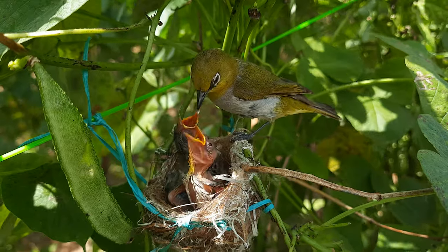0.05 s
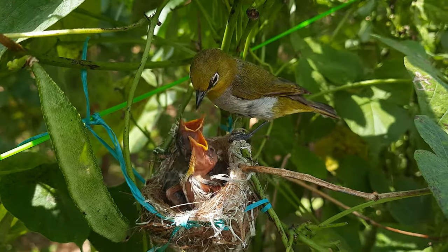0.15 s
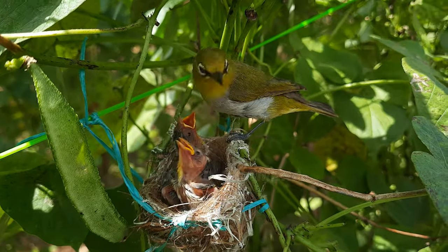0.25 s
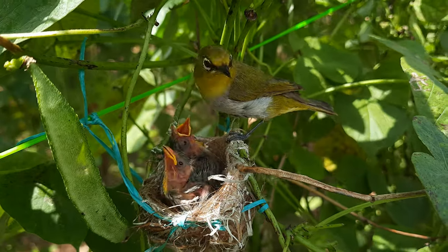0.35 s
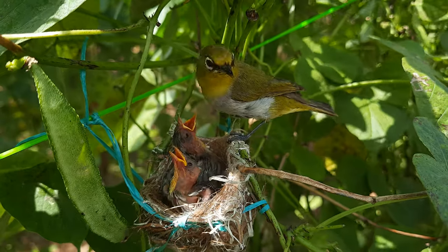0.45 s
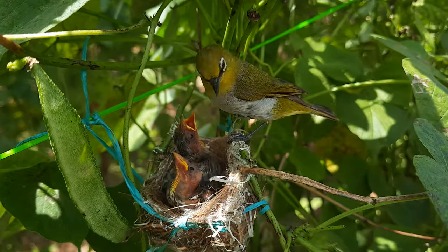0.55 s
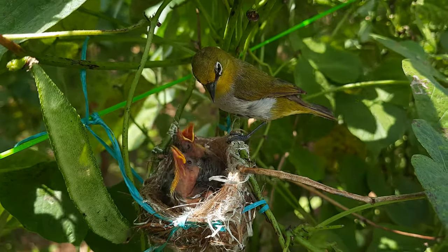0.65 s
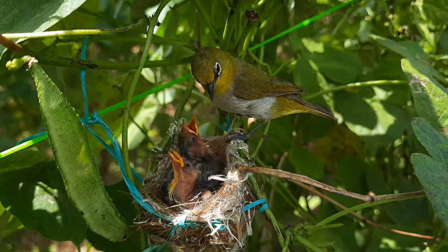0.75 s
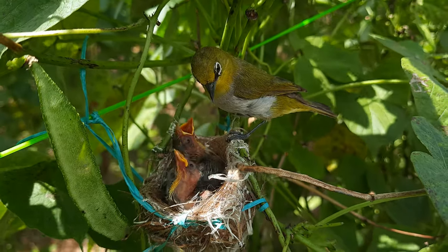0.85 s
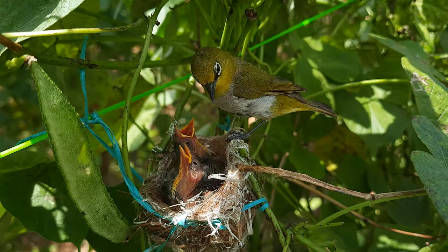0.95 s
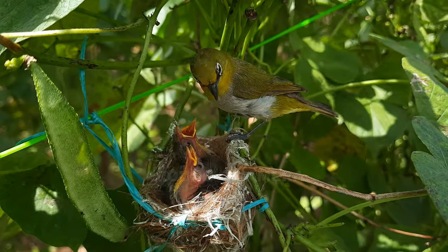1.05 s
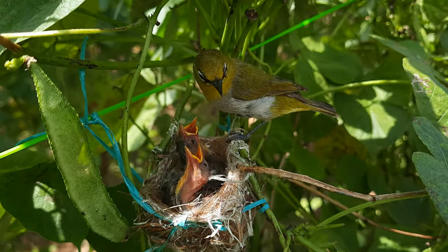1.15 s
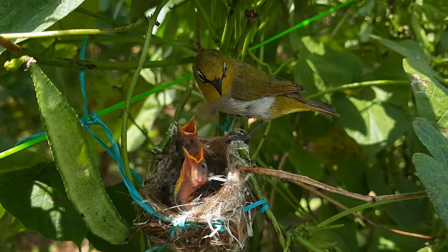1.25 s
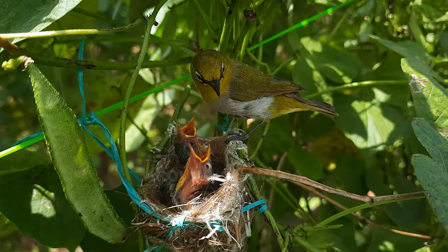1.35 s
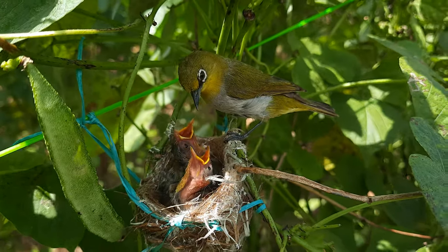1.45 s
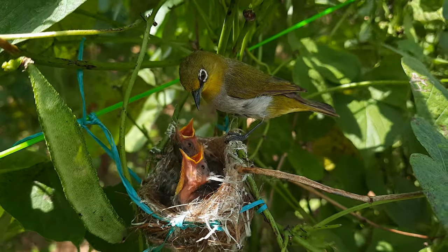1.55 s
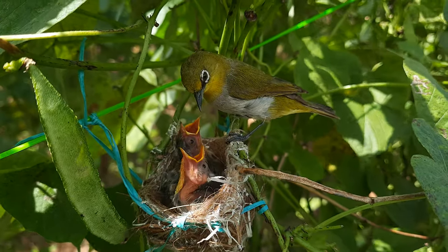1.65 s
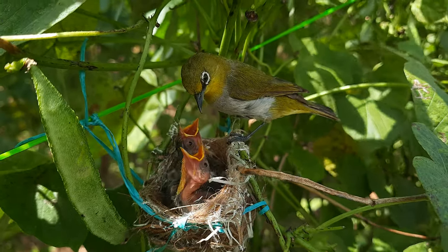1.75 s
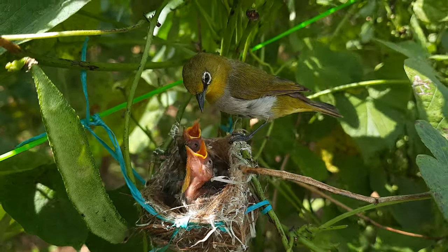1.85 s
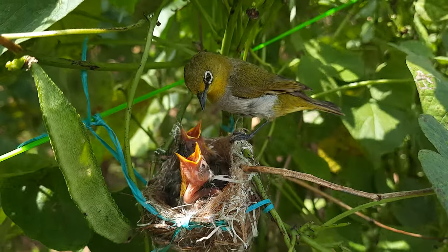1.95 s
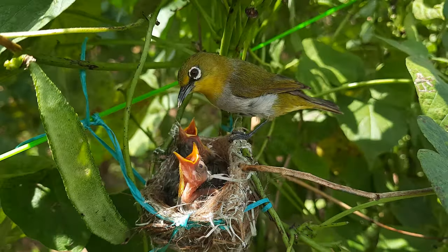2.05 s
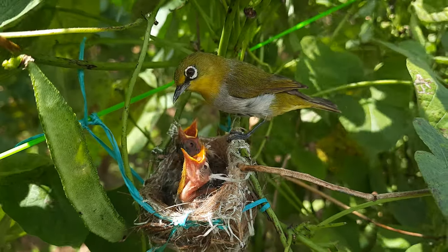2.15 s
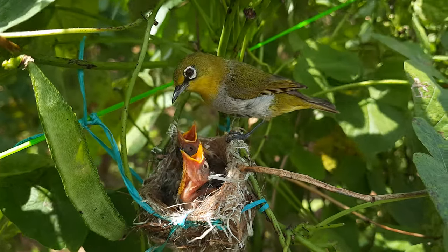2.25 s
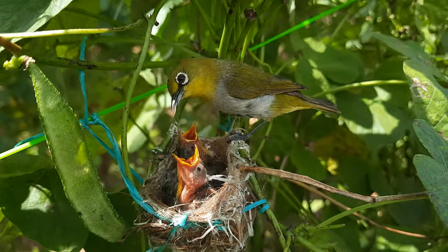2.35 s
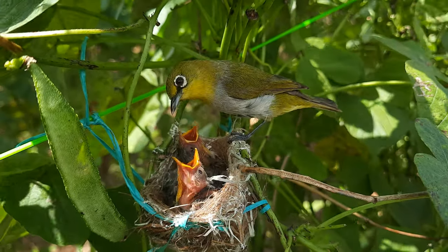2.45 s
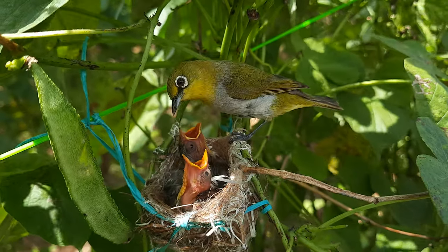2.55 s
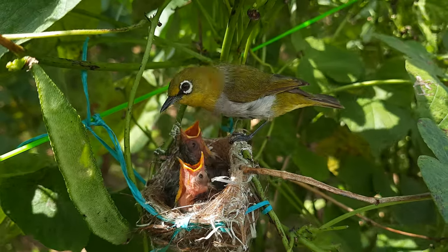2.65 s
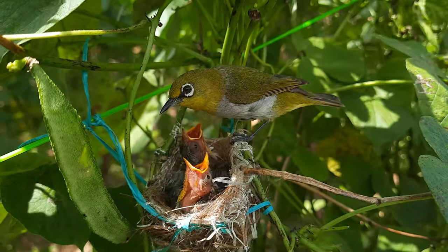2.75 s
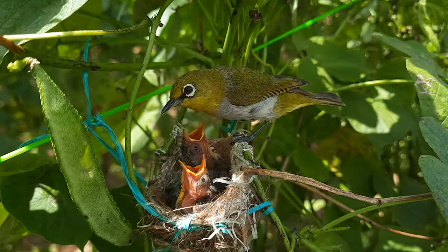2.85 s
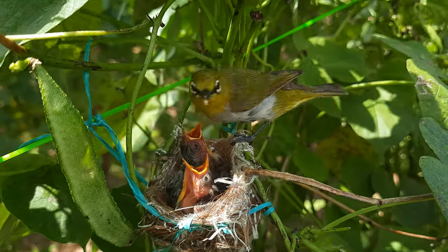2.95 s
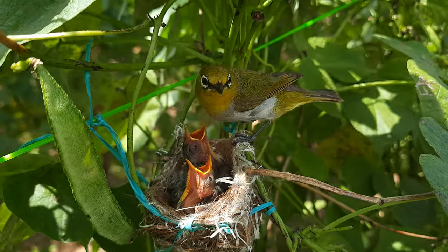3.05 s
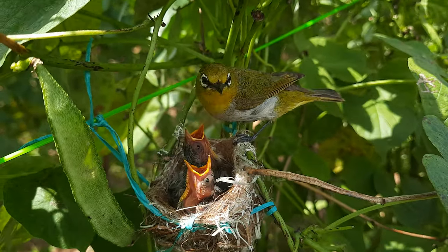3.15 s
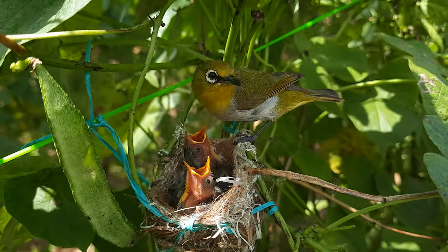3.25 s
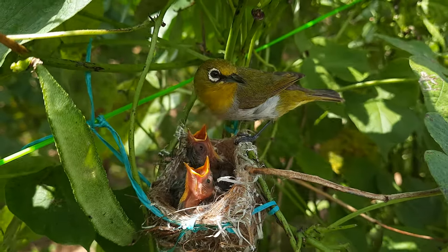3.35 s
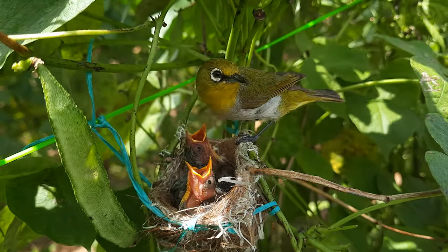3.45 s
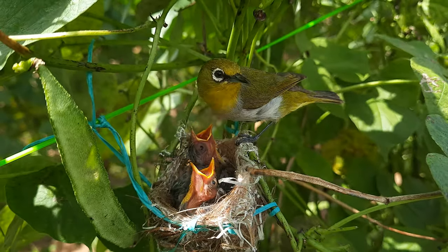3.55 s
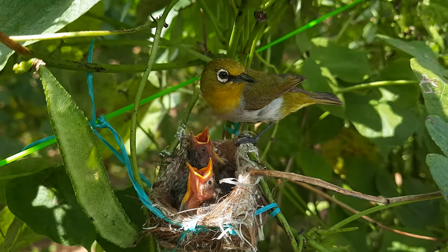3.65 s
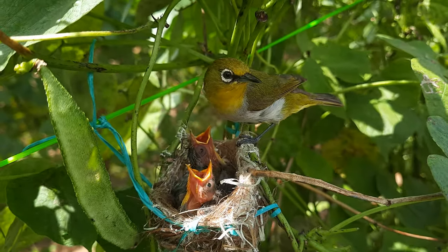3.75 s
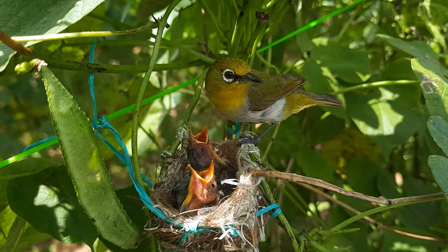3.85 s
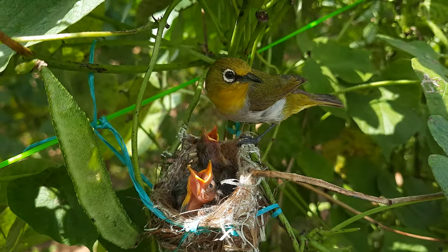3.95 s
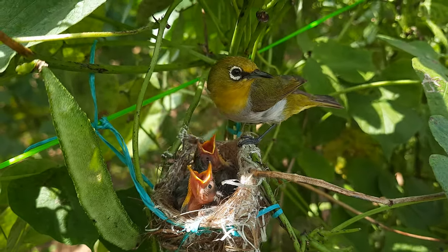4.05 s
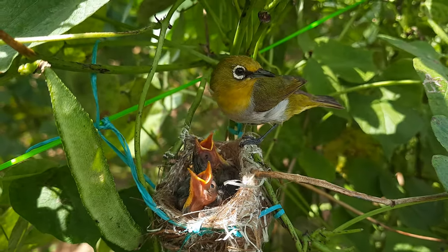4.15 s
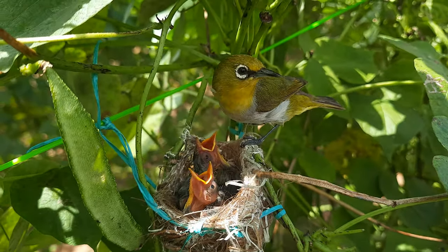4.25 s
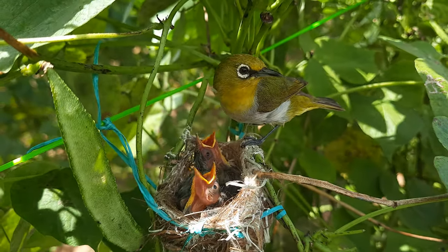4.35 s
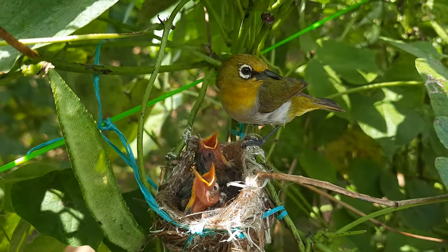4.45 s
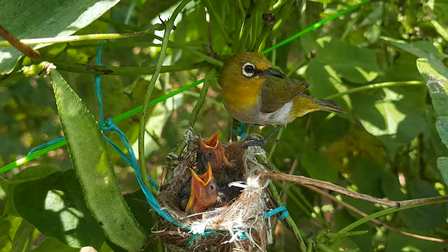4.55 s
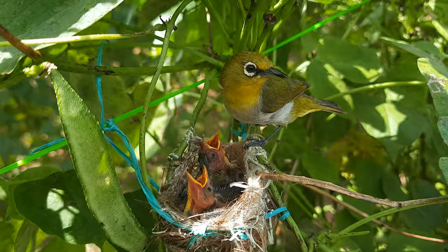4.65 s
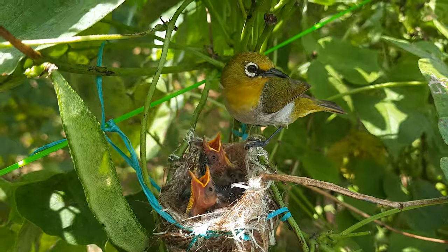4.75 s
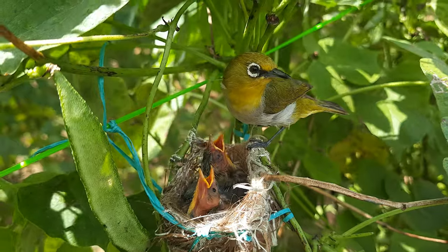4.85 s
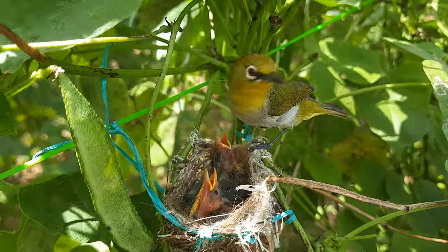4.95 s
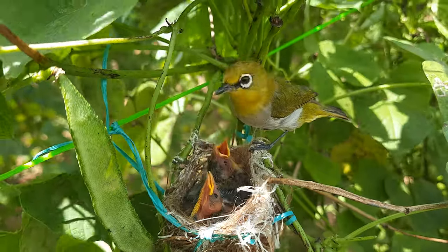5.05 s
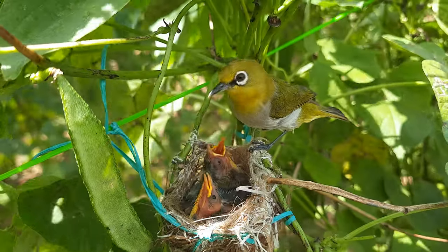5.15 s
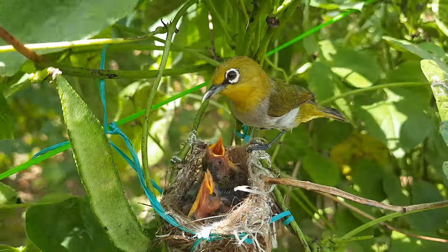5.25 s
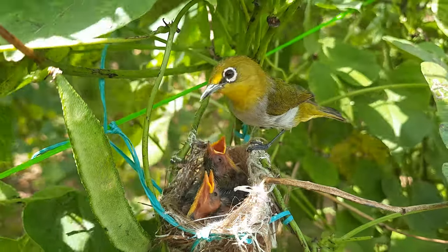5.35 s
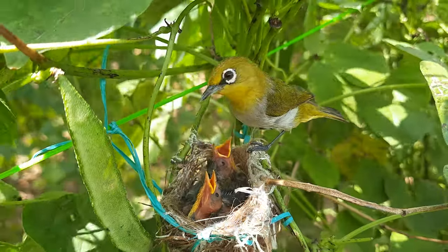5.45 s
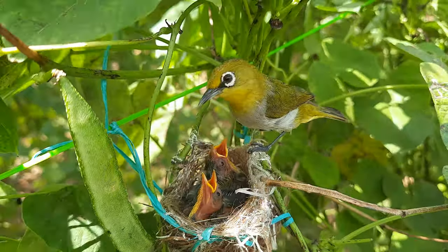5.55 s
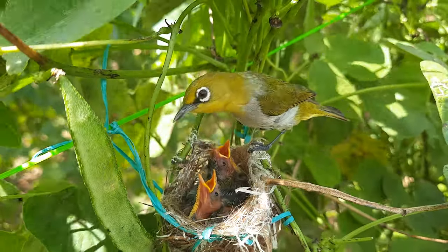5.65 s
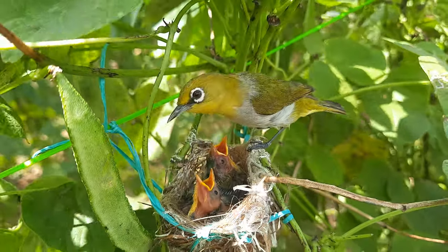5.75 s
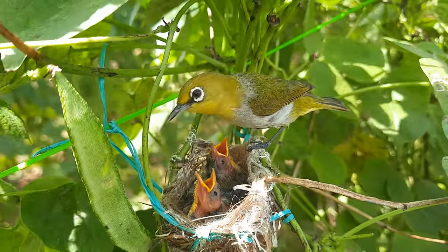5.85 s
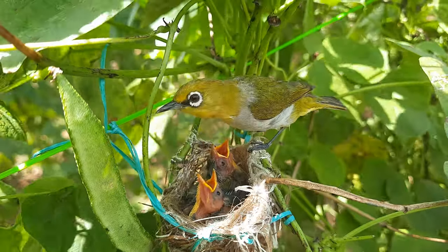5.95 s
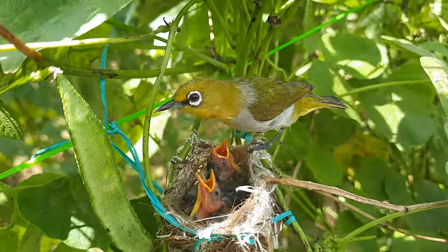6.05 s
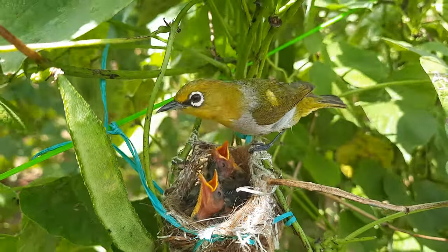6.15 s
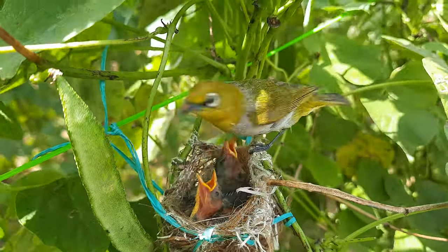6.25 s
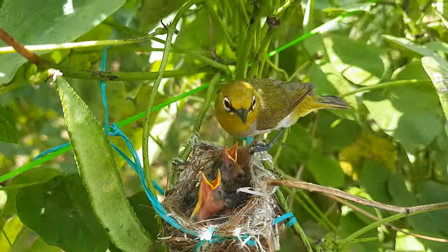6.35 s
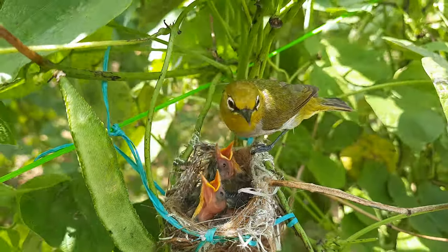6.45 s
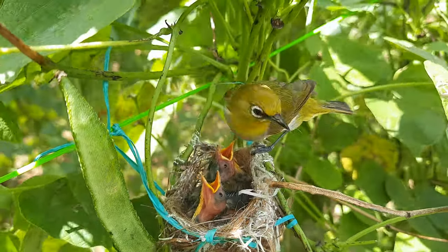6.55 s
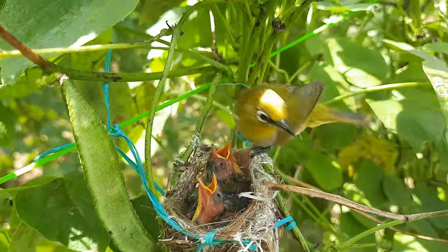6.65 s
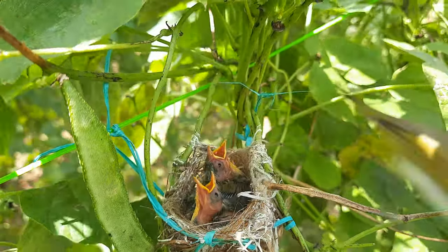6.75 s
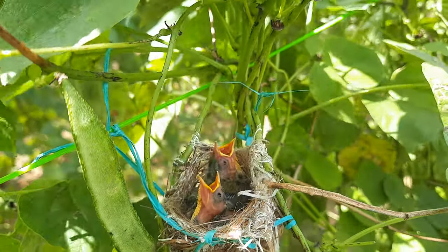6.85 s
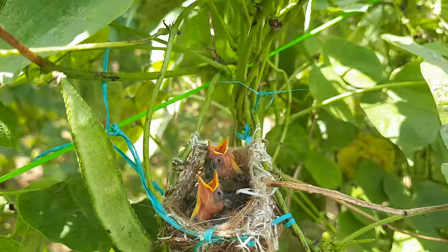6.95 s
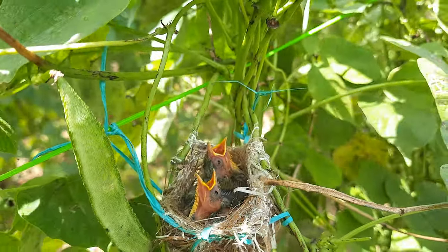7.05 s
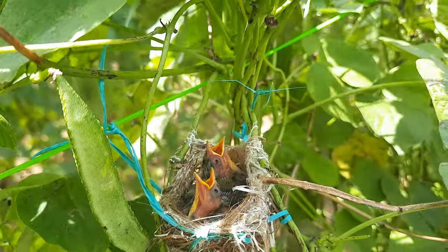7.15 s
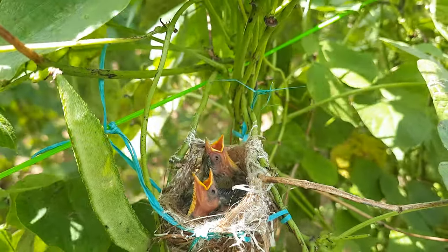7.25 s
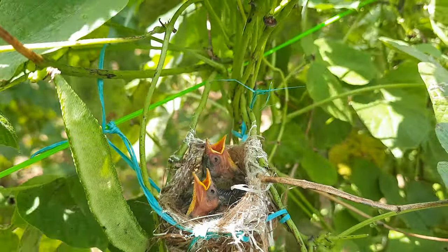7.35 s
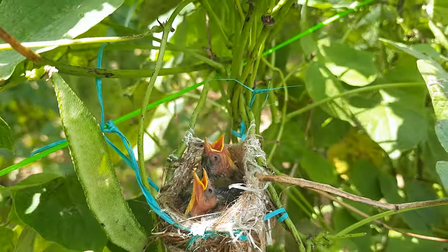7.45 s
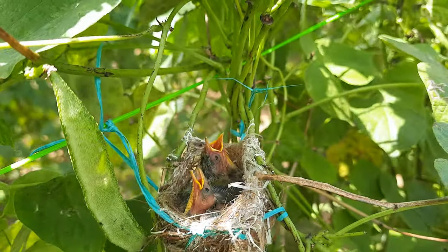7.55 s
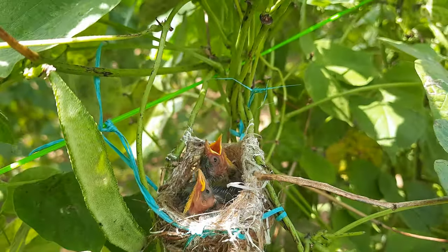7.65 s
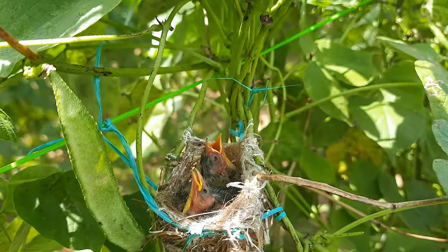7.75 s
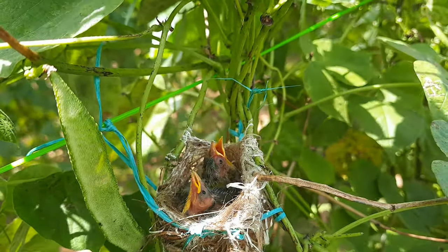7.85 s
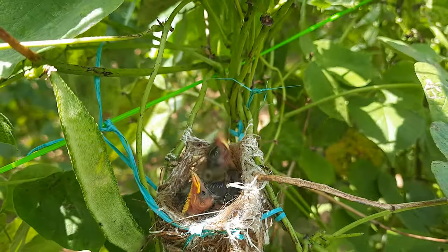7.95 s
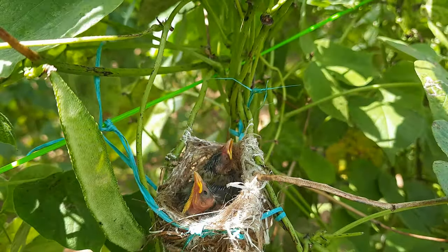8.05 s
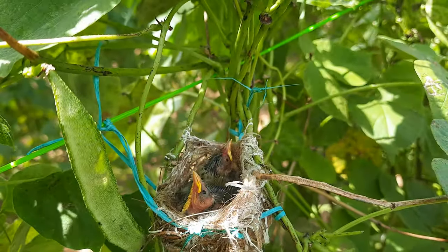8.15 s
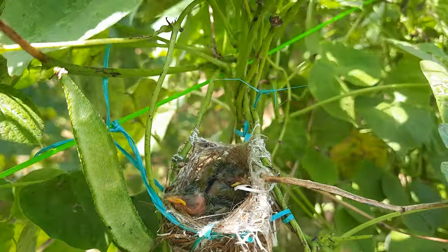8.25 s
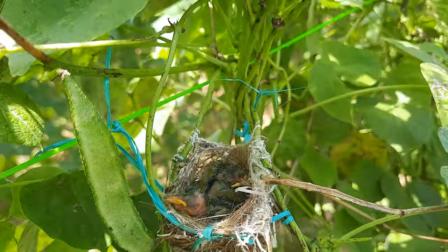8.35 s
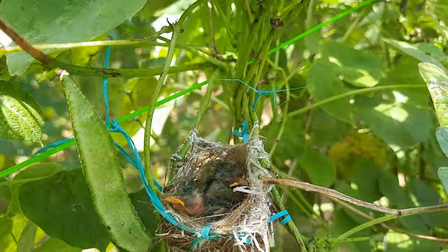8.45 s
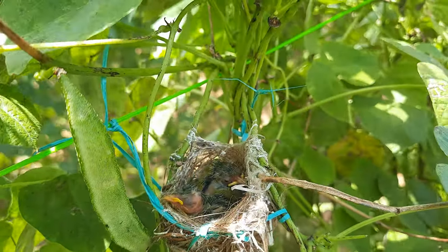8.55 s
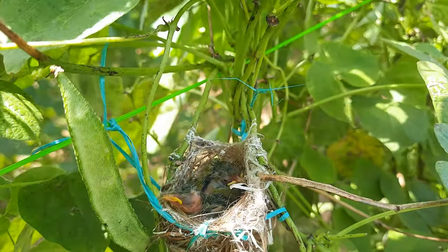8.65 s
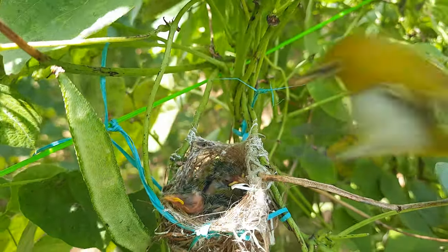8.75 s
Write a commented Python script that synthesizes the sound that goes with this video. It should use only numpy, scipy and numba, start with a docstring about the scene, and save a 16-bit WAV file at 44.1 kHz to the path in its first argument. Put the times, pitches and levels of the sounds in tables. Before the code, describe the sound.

Outdoors among leaves, a close stereo microphone picks up high, slightly raspy chick begging over quiet air and a faint insect-like hiss. A gust buffets early, there is a calmer middle with a distant rooster, then stronger windy thumps and crackly rustling. Short slurred bird chirps, dry ticks and a burst of wing puffs follow; after the last begging whistle it grows quieter, until wings flutter back at the end.

```python
"""Thin two-voiced whistles are heard first: two nestlings begging from a nest in a garden vine.
Gusts buffet each microphone port on its own and stir the leaves; a parent calls, flies off and returns.
Small ticks and soft, dry scuffs are heard; other birds, a rooster and hens are far, over a faint high hiss.
Calls are trembling near sines with harmonics; wind, leaves, wings and air are noise, filtered and swelled."""
import sys
import numpy as np
from scipy import signal
from scipy.fft import rfft, irfft, next_fast_len
from scipy.io import wavfile
from scipy.ndimage import uniform_filter1d, minimum_filter1d
from numba import njit

SR = 44100
rng = np.random.default_rng(int(sys.argv[2]) if len(sys.argv) > 2 else 0)


def master_out(mix):
    """Clip the mix to full scale and print it as 16-bit PCM to the path in sys.argv[1]."""
    frames = np.transpose(np.atleast_2d(mix))
    ceiling = np.clip(frames, -1, 1)
    pcm = np.round(ceiling * 32767).astype(np.int16)
    wavfile.write(sys.argv[1], SR, pcm)


N = 387638
TIME = np.arange(N) / SR

SAG_HZ = 127  # a begging voice sags by this much towards its end
RASP_S = 0.074  # length of the rasp at a call's break


def undb(db):
    """Level and amplitude: 20 dB is a factor of ten in gain."""
    return 10 ** (np.asarray(db) / 20)


def unit(x):
    """Normalization: scale to an rms of 1."""
    return x / np.sqrt(np.mean(x ** 2))


def curve(rows):
    """Linear interpolation: join (time_s, value) rows by straight lines."""
    return np.interp(TIME, *np.transpose(rows))


def colour(x, points, share=1):
    """Spectral shaping: filter by a share of a (frequency_hz, gain_db) outline, straight in log frequency."""
    hz, db = np.transpose(points)
    length = x.shape[-1]
    size = next_fast_len(length)
    bins = np.maximum(np.fft.rfftfreq(size, 1 / SR), 1)
    gain_db = share * np.interp(np.log(bins), np.log(hz), db)
    return irfft(rfft(x, size) * undb(gain_db), size)[..., :length]


def walk(t, rate):
    """Random modulation: normal values, rate of them a second, joined by straight lines."""
    steps = (t - t[0]) * rate
    count = int(steps[-1]) + 2
    return np.interp(steps, np.arange(count), rng.standard_normal(count))


def noise():
    """Incoherent sources: unrelated white noise for the two ports."""
    return rng.standard_normal((2, N))


def swell(at, half_length):
    """Gaussian envelope, about 35 dB down at half_length on either side of its peak."""
    return np.exp(-4 * np.minimum(((TIME - at) / half_length) ** 2, 20))


def place(x, pan_db):
    """Level difference between ports: tip a sound left (positive) or right at equal power."""
    gains = undb(np.array([[pan_db], [-pan_db]]) / 2)
    return x * unit(gains)


def ports(x):
    """Receiver response: each port colours nearby broadband sounds in its own way."""
    # the left port faces the vine but hears less of the top octave; each port takes a share of the outline:
    # frequency_hz, left_minus_right_db (before the shares)
    port_balance = [(900, 5.5), (2400, 11), (5000, 10.5), (7300, 8.5), (8600, 20), (10200, -23.5),
                    (12000, -21.5), (15000, 1)]
    return np.array([colour(x[0], port_balance, 0.26), colour(x[1], port_balance, -0.17)])


def garden(x, t60, wet_db, pan_db, lag_ms):
    """Arrival delay and reverberation: the left port hears lag_ms later; foliage and walls scatter sound."""
    t = np.arange(SR) / SR
    decay = np.exp(-np.log(1000) * t / t60)  # 60 dB down after t60 seconds
    scatter = rng.standard_normal((2, SR)) * decay * np.minimum(t / 0.0079, 1)
    scatter /= np.sqrt(np.sum(scatter ** 2, axis=1, keepdims=True))
    direct = np.array([np.roll(x, int(round(lag_ms * SR / 1000))), x])
    echo = signal.fftconvolve(x[None], scatter, axes=1)[:, :N]
    return place(direct, pan_db) + undb(wet_db) * place(echo, pan_db / 2)


def syrinx(notes, partials_db, jitter, flutter_db, tremor_rate, edge_s, gape=((0, 0),)):
    """Self-sustained oscillation: a membrane sings near sines of trembling pitch and loudness."""
    out = np.zeros(N)
    for note in notes:
        s, hz, db = np.transpose(note)
        first = max(int((s[0] - edge_s / 2) * SR), 0)
        last = min(int((s[-1] + edge_s / 2) * SR), N)
        span = np.arange(first, last)
        t = span / SR
        pitch = np.interp(t, s, hz) * (1 + jitter * walk(t, tremor_rate))
        phase = 2 * np.pi * np.cumsum(pitch) / SR
        gate = np.sin(np.pi / 2 * np.clip(np.minimum(t - t[0], t[-1] - t) / edge_s, 0, 1)) ** 2
        loudness = gate * undb(np.interp(t, s, db) + flutter_db * walk(t, tremor_rate / 2))
        lift_db = np.interp(t, *np.transpose(gape))
        tone = sum(undb(partial_db + k * lift_db) * np.sin((k + 1) * phase)
                   for k, partial_db in enumerate(partials_db))
        out[span] += np.sqrt(2) * loudness * tone
    return out


def bursts(rows, width_hz):
    """Resonance: short swells of band-passed noise; length_s is their width about 2.3 dB down."""
    out = np.zeros(N)
    for at, length_s, hz, db in rows:
        edges_hz = [max(hz - width_hz / 2, 100), hz + width_hz / 2]
        band = signal.butter(2, edges_hz, "band", fs=SR, output="sos")
        hiss = unit(signal.sosfilt(band, rng.standard_normal(N)))
        out += undb(db) * swell(at, 1.95 * length_s) * hiss
    return out


def beg(start, length, low_length, low_hz, high_hz, scoop_hz, low_db, high_db, break_s, drop_hz):
    """Coupled voices: both scoop up, warble together and sag; each stutters alone; the low one may drop."""
    age = np.arange(0, max(length, low_length), 1 / 500)
    # shared warble of 60 Hz at 36 new values a second, and a scoop that closes by a factor e in 45 ms
    bend = 60 * walk(age, 36) - scoop_hz * np.exp(-age / 0.045)
    drops = drop_hz > SAG_HZ
    fallen = drops * (1 - np.exp(-np.maximum(age - break_s, 0) / 0.018))

    def voice(hz, db, joins, ends):
        """One oscillator of the pair, as (time_s, pitch_hz, level_db) rows."""
        late = (age / ends) ** 4
        onset_db = -10.5 * np.exp(-np.maximum(age - joins, 0) / 0.01)
        fade_db = -5 * late
        stutter_db = 3.6 * walk(age, 55)
        pitch = hz + bend - SAG_HZ * late
        rows = np.column_stack([start + age, pitch, db + onset_db + fade_db + stutter_db])
        return rows[(age >= joins) & (age <= ends)]

    # a low voice that drops also gets weaker; the high voice joins after 15 % of the call
    return (voice(low_hz - drop_hz * fallen, low_db - 8.5 * fallen, 0, low_length),
            voice(high_hz, high_db, 0.15 * length, length))


def buzz(at, hz, db):
    """Modulation sidebands: at the break the membrane flaps and throws a comb above its pitch."""
    spacing_hz, loss_db = 578, 3.5  # each step is weaker by loss_db
    return [[(at + side * RASP_S / 2, hz + k * spacing_hz - side * SAG_HZ / 2, db - loss_db * k)
             for side in (-1, 1)] for k in (1, 2, 3)]


def nestlings(coupling=0.16):
    """Beating of two oscillators: both sides of the syrinx whistle at once, and a rasp marks each break."""
    # begging calls: start_s, length_s, low_length_s, low_pitch_hz, high_pitch_hz, scoop_hz (from below),
    # low_level_db, high_level_db, break_s (after start), rasp_level_db, low_drop_hz
    begs = [(0.0, 0.058, 0.035, 5900, 6520, 0, -65, -64, .03, -72, 0),
            (0.202, 0.31, 0.3, 5700, 6460, 560, -56.5, -63.5, .125, -64, 0),
            (1.008, 0.29, 0.25, 5780, 6560, 764, -58.5, -63.5, 0.076, -62, 1097),
            (1.241, 0.22, 0.12, 6360, 6600, 650, -61.5, -76, .1, -75, 0),
            (1.425, 0.26, .19, 5720, 6590, 881, -58.5, -56.5, .11, -64, 1098),
            (1.689, 0.11, 0.077, 5850, 6250, 252, -57, -56, .06, -67, 0),
            (1.8, .28, .28, 5660, 6470, 645, -50.5, -55, 0.058, -55.5, 0),
            (2.294, 0.25, 0.28, 5740, 6440, 766, -55.5, -52.5, 0.14, -66, 849),
            (2.544, 0.052, 0.046, 6200, 6580, 95, -52, -48, 0.0098, -60, 0),
            (2.749, 0.25, 0.23, 5500, 5700, 518, -52, -65, 0.21, -71, 0),
            (3.186, .08, 0.085, 5230, 5400, 332, -60, -78, .05, -84, 0),
            (3.272, .08, 0.083, 5260, 5400, 80, -57.5, -80, .04, -84, 0),
            (3.63, 0.093, 0.097, 5190, 5460, 195, -62.5, -80, .04, -86, 0),
            (4.327, 0.24, 0.2, 6880, 7340, 1500, -57, -74, 0.17, -60, 0),
            (5.138, 0.084, 0.077, 6400, 7000, 700, -56, -65, .05, -64, 0),
            (5.277, .21, .21, 7800, 8300, 1902, -51.5, -57, .13, -63, 0),
            (5.776, 0.28, 0.19, 7740, 8040, 1400, -55.5, -56.5, .13, -62.5, 0),
            (5.957, .26, 0.22, 5790, 6030, 749, -50, -54, 0.082, -58, 0),
            (6.335, 0.22, 0.15, 7940, 8150, 1250, -55.5, -53, 0.11, -64, 0),
            (6.471, 0.16, 0.24, 5760, 6680, 717, -51, -54.5, 0.096, -58.5, 0),
            (6.83, .22, 0.23, 6900, 7250, 845, -57, -61, 0.13, -63, 0),
            (6.91, 0.21, 0.25, 5740, 6450, 558, -46, -52.5, 0.067, -61, 0),
            (7.385, .28, .24, 5670, 6400, 512, -50.5, -53.5, .11, -57, 0)]
    # a wide-open beak lets the overtone out: time_s, overtone_lift_db
    beak_opening = [(0, 12.5), (1.35, 13), (1.8, -3), (2.9, -1), (4, 4), (8.79, -16)]
    voices, rasps, sidebands = [], [], []
    for (start, length, low_length, low_hz, high_hz, scoop_hz,
         low_db, high_db, break_s, rasp_db, drop_hz) in begs:
        if rasp_db > low_db - 8:  # only a rasp near the voice's level throws sidebands
            sidebands += buzz(start + break_s, low_hz - SAG_HZ, rasp_db)
        voices.append(beg(start, length, low_length, low_hz, high_hz, scoop_hz,
                          low_db, high_db, break_s, drop_hz))
        rasps.append((start + break_s, RASP_S, (low_hz + high_hz - drop_hz) / 2, rasp_db))
    low_notes, high_notes = zip(*voices)
    tremble = dict(jitter=.01, flutter_db=1.8, tremor_rate=450, edge_s=.008, gape=beak_opening)
    low = syrinx(low_notes, [0, -20], **tremble)
    high = syrinx(high_notes, [0, -24], **tremble)
    # the two membranes share one air stream, so their beat throws sidebands above and below
    power = uniform_filter1d((low + high) ** 2, size=12)
    beat = power / (np.abs(uniform_filter1d(power, size=200)) + 1e-12) - 1
    comb = syrinx(sidebands, [0], jitter=.012, flutter_db=3, tremor_rate=400, edge_s=.015)
    whistles = (low + high) * (1 + coupling * beat) + comb
    calls = whistles + bursts(rasps, width_hz=1600)
    return ports(garden(calls, t60=0.13, wet_db=-13.5, pan_db=6.5, lag_ms=.43))


def leaves():
    """Superposition of impulses: countless tiny scrapes of leaf on leaf merge into an uneven, crackly hiss."""
    # stirring leaves: time_s, level_db
    stirring = [(0, -62.5), (1.3, -64.5), (1.9, -57.5), (2.55, -62.5), (3.15, -73), (3.43, -62.5),
                (3.7, -79), (4.35, -74), (5.15, -49.5), (5.62, -50.5), (5.76, -55), (6.2, -52.5),
                (6.43, -47.5), (7.1, -48.5), (7.4, -56.5), (7.65, -57.5), (8.0, -71), (8.79, -62)]
    # spectrum of the rustle: frequency_hz, relative_level_db
    rustle_colour = [(500, 3), (1100, -9.5), (1900, -1), (2700, -3.5), (4500, -2), (6800, -0.5),
                     (8100, 4.5), (9300, -4.5), (12500, -7.5), (15500, -11)]
    # where the leaves stir: time_s, left_minus_right_db
    stir_side = [(0, -2.5), (1.2, -7), (2, -2), (4.5, -2), (5.5, 0), (6.5, 1), (7.3, 1.5), (8.79, 5)]
    sizes = np.minimum(rng.exponential(size=N // 40 + 1), 4.5)  # each holds for 40 samples
    scrapes = noise() * undb(2.4 * np.repeat(sizes, 40)[:N])
    hiss = unit(ports(colour(scrapes, rustle_colour)))
    side_db = np.array([[1], [-1]]) * curve(stir_side) / 2
    return hiss * undb(curve(stirring) + side_db + 1.04 * walk(TIME, 60))


def background():
    """Stationary noise: still garden air, and above it a thin hiss, as of insects."""
    # spectrum of the air: frequency_hz, relative_level_db
    air_colour = [(20, -11.5), (58, -0.5), (130, -10), (300, -8), (600, -15.5), (1100, -22.5),
                  (1900, -21.5), (3800, -31.5), (8000, -30.5), (10500, -34.5), (15500, -35.5)]
    # thin hiss: time_s, level_db (before an 8 dB lift)
    insects = [(0, -72.5), (1.4, -73.5), (1.9, -68.5), (2.85, -76), (4.4, -75.5), (4.8, -76)]
    # spectrum of the thin hiss: frequency_hz, relative_level_db
    insect_colour = [(4000, -22), (6500, -15.5), (7400, -7.5), (8200, -0.5), (8800, -6), (9300, -16),
                     (11000, -42)]
    air = unit(colour(noise(), air_colour)) * undb(-60 + 0.12 * walk(TIME, 13.0))
    hiss_db = curve(insects) + 8.0 + 3.1 * walk(TIME, 30)
    hiss = unit(colour(noise(), insect_colour)) * undb(hiss_db)
    return air + place(hiss, pan_db=1.0)


def wind_level(breeze, side):
    """Addition of powers: a fluttering breeze, and gusts that rise fast, hold and die away, in dB."""
    # gusts: full_s, port (0 left, 1 right), hold_s, level_db (before the wind's overall gain)
    gusts = [(0.198, 1, 0.035, -37), (0.334, 1, 0.072, -38.5), (1.529, 1, 0.039, -32),
             (1.65, 1, 0.0094, -21.5), (1.823, 1, 0.09, -16.5), (1.852, 0, 0.094, -16),
             (2.186, 1, 0.026, -24), (2.284, 0, 0.095, -33.5), (2.342, 1, 0.02, -22),
             (2.532, 1, 0.058, -23), (2.715, 1, 0.017, -31.5), (2.946, 1, 0.027, -24.5),
             (3.212, 1, 0.2, -26), (3.561, 1, 0.13, -37), (3.849, 1, 0.017, -32.5), (4.048, 1, .02, -38.5),
             (4.709, 0, .015, -39), (4.899, 0, 0.013, -37.5), (5.045, 0, 0.021, -24.5),
             (5.245, 1, .04, -36), (5.261, 0, 0.031, -26), (5.376, 1, 0.033, -21), (5.425, 0, 0.0076, -24),
             (5.557, 0, 0.061, -17), (5.56, 1, .05, -41), (5.778, 0, 0.053, -30), (5.93, 0, 0.12, -19.5),
             (6.379, 0, 0.027, -15.5), (6.43, 1, 0.027, -29), (6.488, 0, 0.064, -28.5),
             (6.599, 1, 0.016, -30.5), (6.878, 1, 0.064, -19), (7.084, 0, .11, -12.5),
             (7.207, 1, .02, -22.5), (7.361, 1, .025, -21), (7.377, 0, 0.016, -28), (7.452, 1, 0.075, -18),
             (7.47, 0, 0.029, -32.5), (7.748, 0, 0.012, -32.5), (7.741, 1, 0.012, -30.5),
             (8.113, 1, .1, -36.5), (8.659, 1, 0.019, -39.5), (8.776, 1, .02, -32)]
    attack_s, release_s = 0.015, 0.023  # time to grow or die by a factor e
    power = undb(curve(breeze) + 5.5 * walk(TIME, 24)) ** 2
    for at, port, hold, db in gusts:
        if round(port) == side:
            fade = np.maximum((at - TIME) / attack_s, (TIME - at - hold) / release_s)
            power = power + (undb(db) * np.exp(-np.clip(fade, 0, 20))) ** 2
    return 10 * np.log10(power)


@njit
def lowpass(x, hz, damping):
    """Second-order resonator: a state-variable low-pass with a moving corner."""
    y, b, l = np.empty(len(x)), 0., 0.
    for i in range(len(x)):
        g = np.tan(np.pi * hz[i] / SR)
        v = (b + g * (x[i] - l)) / (1 + g * (g + damping))
        y[i] = l + g * v
        b, l = 2 * v - b, 2 * y[i] - l
    return y


def buffet(db, corner_hz):
    """Turbulence at one port: the harder the gust, the smaller and faster its eddies."""
    eddies = colour(rng.standard_normal(N), [(15, -54), (30, -20), (48, 7.0), (85, 6), (150, -6),
                                             (240, -7.0), (400, -17), (700, -14.0), (2000, -38)])
    eddy_size = .17 * walk(TIME, 70)  # octaves
    # the corner is corner_hz at -25 dB and climbs an octave every 23 dB
    corner = np.clip(corner_hz * 2 ** ((db + 25) / 23 - eddy_size), 80, 500)
    rumble = lowpass(lowpass(eddies, corner, np.sqrt(2)), corner, np.sqrt(2))
    rumble = lowpass(rumble, 1.68 * corner, 1.)  # the port averages out eddies smaller than itself
    # the slowest eddies are thinned, over a wider band as the corner climbs
    rumble = rumble - lowpass(rumble, 0.54 * corner, 2.2)
    # the gust alone sets the strength from moment to moment
    power = uniform_filter1d(uniform_filter1d(rumble ** 2, size=950), size=950)
    return rumble / np.sqrt(np.abs(power) + 1e-12) * undb(db)


def thumps(cycles=0.6):
    """Pressure pulse: a single hard eddy strikes one port, pushing and then pulling the diaphragm."""
    # single eddies: time_s, port (0 left, 1 right), frequency_hz, level_db (of the sine before its swell)
    strikes = [(1.886, 1, 246, -2.5), (2.188, 1, 194, -14.5), (5.047, 0, 113, -16), (5.423, 0, 171, -12.5),
               (2.967, 1, 162, -23), (5.577, 0, 231, -8.5), (5.771, 0, 187, -18.5),
               (6.027, 0, 129.6, -11.5), (6.381, 0, 188, -10.5), (7.093, 0, 202, -5), (7.107, 0, 212, 1),
               (7.126, 0, 304, -2.5), (7.16, 0, 273, 0), (7.454, 1, 180, -1), (7.509, 1, 206, -10)]
    out = np.zeros((2, N))
    for at, port, hz, db in strikes:
        turns = (TIME - at) * hz
        out[int(round(port))] -= undb(db) * np.sin(2 * np.pi * turns) * swell(at, 2 * cycles / hz)
    return out


def wind():
    """Flow noise: each port has its own breeze, gusts and thumps."""
    # the breeze between gusts, left and right: time_s, level_db (before the overall gain below)
    breezes = [[(0, -60), (.7, -60), (1.1, -82), (1.6, -54), (2.02, -34), (2.6, -47.5), (3.15, -62),
                (3.45, -50.5), (3.9, -67), (4.6, -68), (5.1, -33), (6.1, -36), (6.65, -37.5), (7.25, -22.5),
                (7.65, -53.5), (8.1, -54), (8.55, -56), (8.79, -41)], [(0, -45.5), (.3, -55), (.75, -57), (1.0, -94), (1.42, -58.5),
                                     (1.7, -26), (2.0, -28), (2.65, -34.5), (3.1, -49), (3.5, -39),
                                     (4.1, -52), (4.4, -63), (5.5, -51), (6.7, -54), (7.4, -27), (7.7, -35),
                                     (7.95, -51), (8.5, -75)]]
    # where the rumble of a moderate gust falls off, left and right: corner_hz
    corners = [255, 234]
    rumble = np.array([buffet(wind_level(breeze, side), corners[side])
                       for side, breeze in enumerate(breezes)])
    return undb(0.33) * rumble + thumps()


def cluck(start, length, hz, rise_hz, db):
    """Pitch contour: a hen's call is a tilted arch, lower and weaker at its ends."""
    along = np.linspace(-1, 1, 15)
    pitch = hz + rise_hz * along / 2 - 36 * along ** 2
    return np.column_stack([start + length * (along + 1) / 2, pitch, db - 1.5 * along ** 2])


def poultry():
    """Harmonics and throat resonance: hoarse far calls with strong echoes."""
    # far rooster, one curve per syllable: time_s, pitch_hz, level_db (before the throat)
    rooster_syllables = [
        [(4.18, 707, -81), (4.26, 689, -71), (4.45, 696, -82)],
        [(4.47, 772, -73), (4.62, 774, -75), (4.74, 773.6, -61.5), (4.92, 761, -73), (5.2, 703, -65),
         (5.45, 697.6, -64.5), (5.68, 684, -63), (5.85, 676, -68), (5.98, 684, -71)],
    ]
    # the throat picks out one partial or the other: frequency_hz, gain_db
    rooster_throat = [(690, -16.5), (765, -1.5), (1100, -2), (1380, 4), (1530, 2), (2100, -24), (3100, -30)]
    # far hens: start_s, length_s, pitch_hz, rise_hz, level_db (before the partials' own levels)
    hen_calls = [(.23, 0.11, 615, 36, -58), (.65, 0.1, 546, -27, -56.5), (.82, 0.076, 465, 32, -62),
                 (.96, 0.055, 780, 29.5, -69), (1.37, 0.26, 710, 180, -69.5),
                 (1.845, 0.067, 570, -7, -49.5), (2.46, 0.057, 608, 35, -59), (2.56, 0.067, 513, 71, -55.5),
                 (3.67, 0.076, 712, 28, -66), (7.91, .12, 732, 53.5, -64.5)]
    crow = syrinx(rooster_syllables, [0, 0, -3, -6],
                  jitter=.028, flutter_db=3.5, tremor_rate=160, edge_s=.03)
    rooster = colour(crow, rooster_throat)
    hens = syrinx([cluck(*row) for row in hen_calls], [-2, -23],
                  jitter=.075, flutter_db=3, tremor_rate=200, edge_s=.015)
    return (garden(rooster, t60=0.37, wet_db=-0.5, pan_db=-3, lag_ms=-0.27)
            + garden(hens, t60=0.46, wet_db=-5, pan_db=3.0, lag_ms=0))


def ticks():
    """Impulse excitation: dry little snaps of twig and beak die away exponentially in the nest."""
    # ticks: time_s, level_db (before a 7 dB cut)
    snaps = [(0.522, -43), (1.7964, -36), (2.1866, -39), (2.4574, -46), (2.6114, -50), (5.6061, -28.5),
             (5.6218, -29), (5.657, -33.5), (5.6823, -28.5), (6.333, -30), (6.4412, -25), (6.844, -27),
             (7.1057, -27), (7.2679, -40), (7.5574, -41), (7.6187, -25), (8.5145, -33), (8.635, -38)]
    # spectrum of a tick: frequency_hz, relative_level_db
    snap_colour = [(1000, -20), (4000, -13), (6500, -5), (8200, 0), (9500, -11), (15000, -24)]
    envelope = np.zeros(N)
    for at, db in snaps:
        envelope[int(at * SR)] += undb(db)
    decay_s = .0014  # time to die by a factor e
    envelope = signal.lfilter([1], [1, -np.exp(-1 / (decay_s * SR))], envelope + 1e-18)
    return unit(ports(colour(noise(), snap_colour))) * envelope * undb(-7)


def slur(start, length, turn_s, start_hz, turn_hz, end_hz, db):
    """Frequency glide: a chirp slides into a rounded turn, where it is loudest, and out again."""
    age = np.arange(0, length, 1 / 500)
    away = np.interp(age, [0, turn_s, length], [-1, 0, 1]) ** 2
    hz = turn_hz + (np.where(age < turn_s, start_hz, end_hz) - turn_hz) * away
    return np.column_stack([start + age, hz, db - 3 * away])


def adults():
    """Source and filter: short slurred calls of the parent and others; a nasal throat shapes one bird's."""
    # slurred chirps: start_s, length_s, turn_s (after start), start_hz, turn_hz, end_hz, level_db (at turn)
    chirp_calls = [(4.448, 0.21, 0.069, 4300, 5250, 4800, -58.5),
                   (4.454, 0.087, .07, 4400, 3920, 3900, -63.5),
                   (5.097, 0.16, 0.043, 4800, 5680, 5050, -53),
                   (7.083, 0.11, .075, 4030, 3175, 3360, -50.5),
                   (7.707, 0.093, 0.046, 4580, 4800, 4270, -61)]
    # a larger bird's nasal calls: the same columns, level_db before the throat
    nasal_calls = [(5.13, .17, .05, 1893, 1800, 1625, -55), (8.675, 0.087, 0.051, 1660, 1462, 1560, -46)]
    # that bird's throat: frequency_hz, gain_db
    nasal_throat = [(1450, -26), (1820, -3), (2300, 1), (3000, 2), (3600, -3.5), (4600, -45), (6000, -17),
                    (7500, 3)]
    chirps = syrinx([slur(*row) for row in chirp_calls], [0, -26],
                    jitter=.016, flutter_db=4, tremor_rate=400, edge_s=.01)
    nasal = syrinx([slur(*row) for row in nasal_calls], [0, 0, 0, 0],
                   jitter=.018, flutter_db=3.5, tremor_rate=400, edge_s=.01)
    return (garden(chirps, t60=0.27, wet_db=-7.0, pan_db=11, lag_ms=0.42)
            + garden(colour(nasal, nasal_throat), t60=0.046, wet_db=-15, pan_db=7.5, lag_ms=.5))


def scuffs():
    """Band-limited noise: soft, dry scuffs, far to the left."""
    # scuffs: time_s (of the peak), length_s, centre_hz, level_db
    scuff_rows = [(4.9, 0.017, 2770, -55), (8.43, 0.047, 1280, -59.5), (8.43, 0.067, 2120, -65)]
    return garden(bursts(scuff_rows, width_hz=660), t60=.2, wet_db=-19, pan_db=21, lag_ms=0)


def wings():
    """Jet noise: each stroke pushes a puff of air through the feathers, off to the right."""
    # wing strokes: time_s (of the peak), half_length_s, level_db
    wing_strokes = [(6.443, 0.088, -54), (6.777, .025, -57), (6.868, 0.016, -37), (6.899, 0.035, -37),
                    (6.927, 0.022, -35), (6.96, 0.03, -38.5), (7, 0.052, -43.5), (8.498, 0.032, -53.5),
                    (8.644, .018, -45), (8.676, 0.038, -47), (8.766, 0.031, -46), (8.79, 0.018, -39)]
    # spectrum of a puff: frequency_hz, relative_level_db
    wing_colour = [(100, 21), (450, 15.5), (900, 6.5), (1800, 2), (4000, -1.5), (8200, 6), (9800, -1.5),
                   (12000, 1.5), (15500, 2.5)]
    strokes = sum(undb(db) * swell(at, half_length) for at, half_length, db in wing_strokes)
    return place(unit(ports(colour(noise(), wing_colour))) * strokes, pan_db=-7.5)


def scene():
    """Superposition: everything as it reaches the two ports."""
    near = nestlings() + leaves() + wind() + ticks() + wings()
    return near + background() + poultry() + adults() + scuffs()


def record(dry):
    """Gain control and band limit: a look-ahead limiter eases the hardest gusts; the very top is cut."""
    room = np.minimum(.93 / (np.abs(dry).max(axis=0) + 1e-9), 1)
    gain = uniform_filter1d(minimum_filter1d(room, size=441), size=441)  # windows of 10 ms
    top_hz = 15850
    return signal.sosfilt(signal.ellip(10, .2, 80, top_hz, fs=SR, output="sos"), dry * gain)


dry = scene()
out = record(dry)
master_out(out)
```